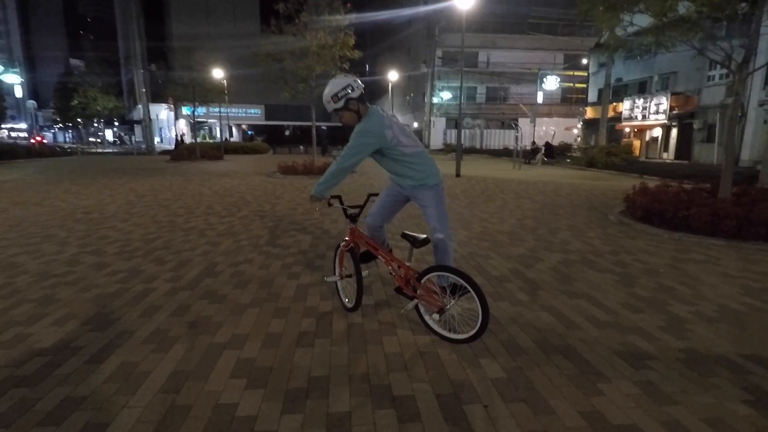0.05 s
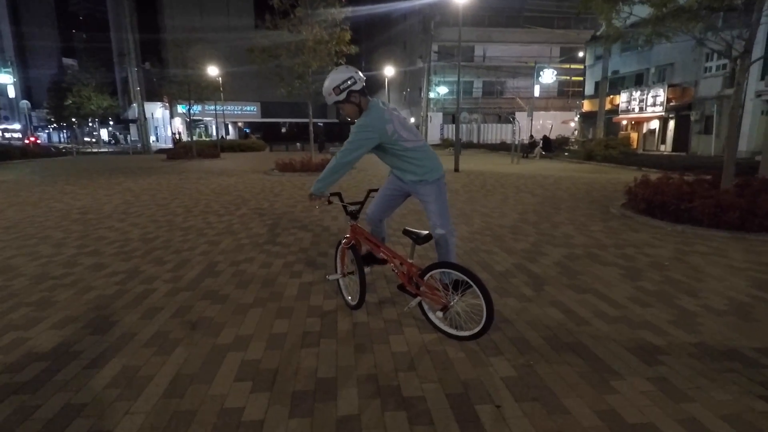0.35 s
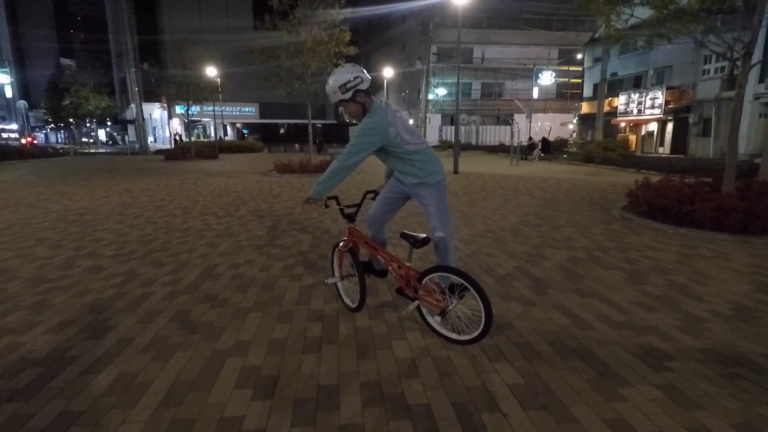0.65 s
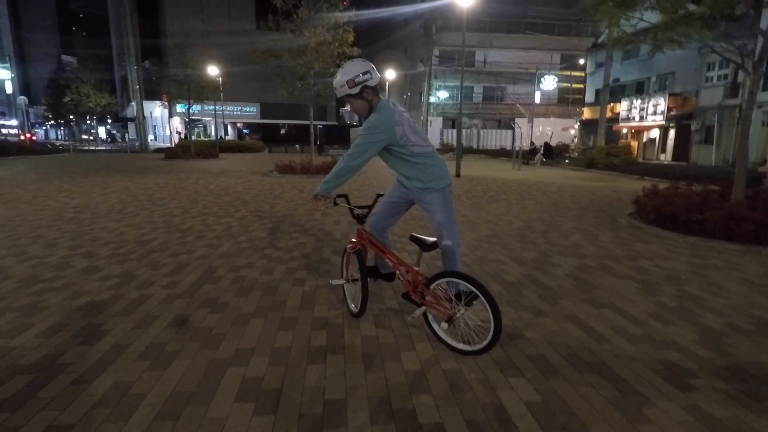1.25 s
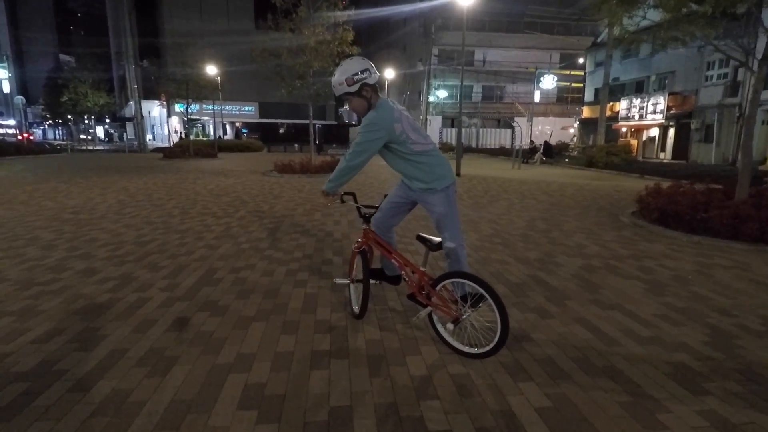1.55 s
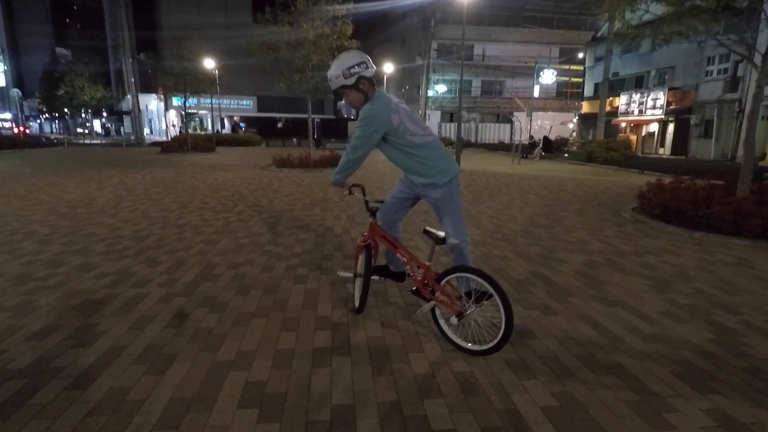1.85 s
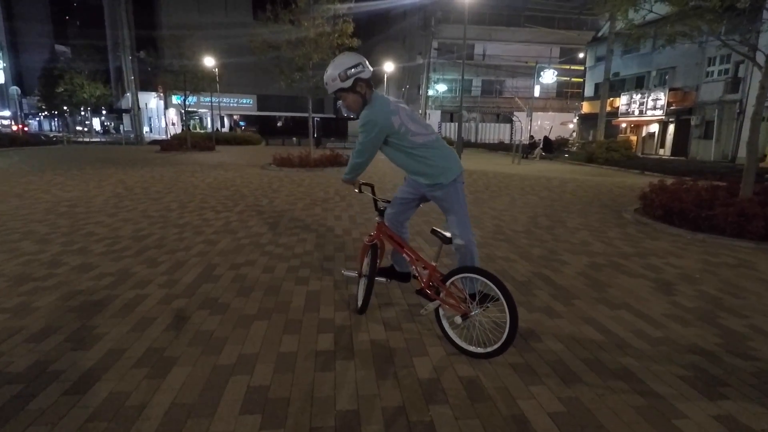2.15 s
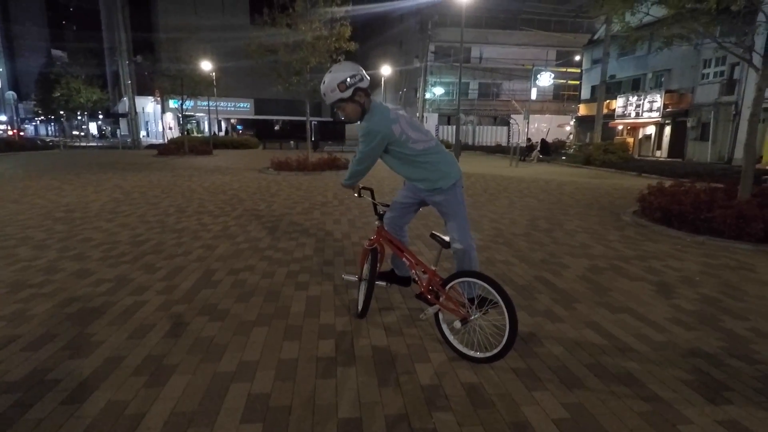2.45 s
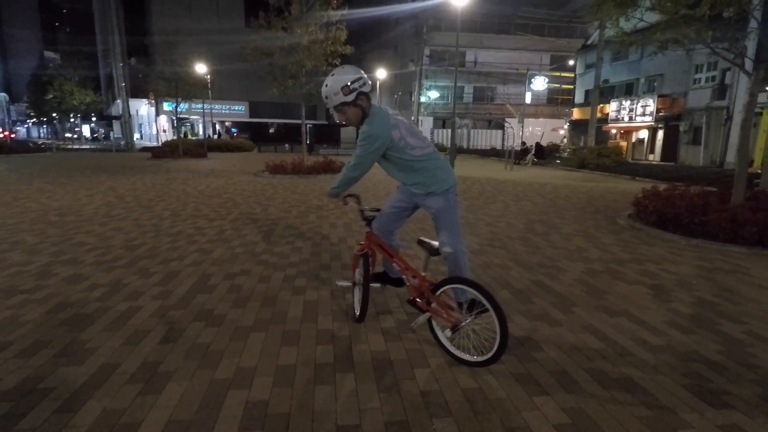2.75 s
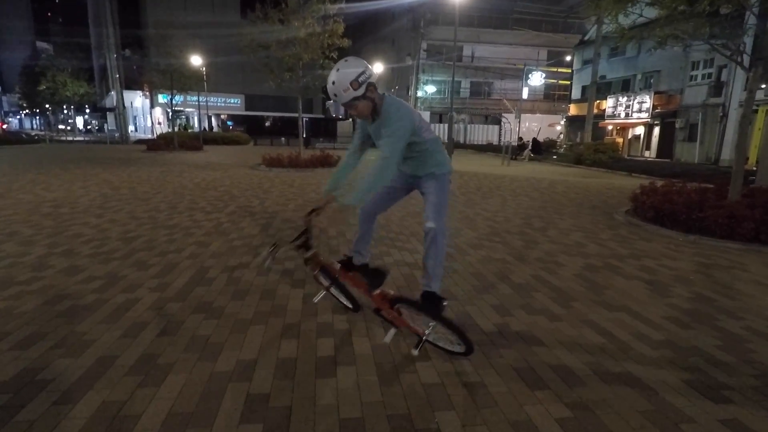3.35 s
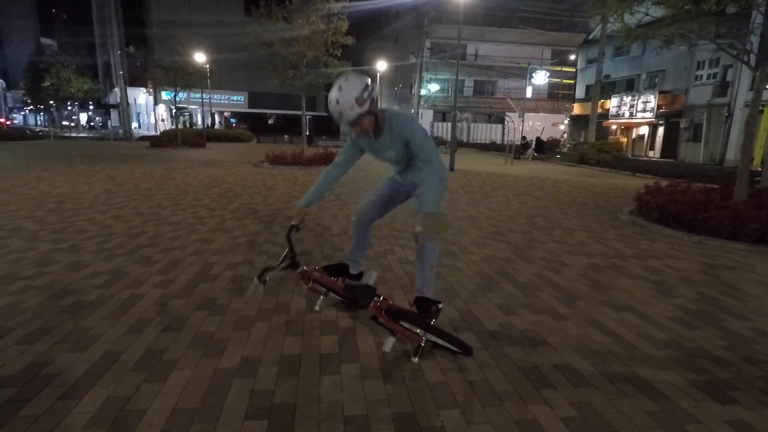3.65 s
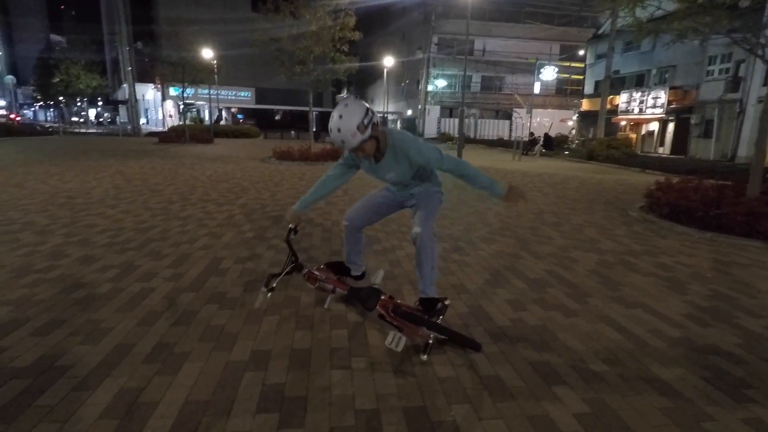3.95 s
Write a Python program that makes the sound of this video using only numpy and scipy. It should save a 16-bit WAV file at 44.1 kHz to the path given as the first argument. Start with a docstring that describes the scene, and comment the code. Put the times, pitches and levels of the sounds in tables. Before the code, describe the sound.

In an open city square, wind rumbles on the microphone over steady far traffic. A nearby bicycle's tyres scuff and its brake chirps faintly, metal clinks once, then the bicycle drops onto the stones with a brief ringing clatter.

```python
"""Air buffets a stereo microphone over the hum of distant traffic, on a paved city square at night.
Nearby a rider balances a small bicycle: the tyres scuff, a brake chirps, and metal clinks sharply once.
At about 3.6 s the bicycle goes down on its side. Pedal, bar and frame strike the paving and ring,
the chain rattles, and far house fronts return a thin tail."""
import sys
import numpy as np
from scipy import signal
from scipy.fft import rfft, irfft
from scipy.io import wavfile
from scipy.ndimage import uniform_filter1d

SR = 44100
rng = np.random.default_rng(int(sys.argv[2]) if len(sys.argv) > 2 else 0)


def output_pcm(signal):
    """Save a mono or channel-first signal as 16-bit PCM at the path in sys.argv[1].

    Samples are clipped to [-1, 1] before scaling.
    """
    pcm = np.clip(np.atleast_2d(signal).T, -1, 1) * 32767
    wavfile.write(sys.argv[1], SR, np.round(pcm).astype(np.int16))


N = 176400

# the bicycle's blows on the paving (t/s, then level/dB of thud, frame ring, clank, chain sizzle)
BLOWS = [(3.557, -36, -39.5, -46.5, -66), (3.571, -32.5, -44, -45.5, -59), (3.604, -45, -42, -47.5, -64),
         (3.620, -46, -41.5, -46, -57.5), (3.659, -45, -34, -40.5, -64), (3.6655, -34, -28, -41.5, -64),
         (3.6715, -49, -43, -37.5, -54), (3.686, -40, -37, -36.5, -58), (3.7006, -17.5, -27.5, -36, -55),
         (3.709, -23.5, -24.5, -37.5, -58), (3.716, -29.5, -28.5, -36.5, -42.5),
         (3.729, -26.5, -42, -35.5, -44), (3.742, -30, -34, -38.5, -44), (3.756, -32.5, -40, -45, -55),
         (3.772, -42, -38, -41.5, -44), (3.793, -44, -57, -51, -66), (3.802, -45, -55, -44, -62),
         (3.827, -42, -50, -51, -65), (3.842, -38, -43, -53, -67), (3.866, -36, -43, -51, -67),
         (3.893, -48, -48, -48, -67), (3.922, -30, -46, -59, -64)]
# contact noise, a band for each level of a blow
# (low f/Hz, high f/Hz, level/dB, decay/s, left-right correlation, left minus right/dB)
CONTACT_BANDS = [(90, 330, -9, 0.0092, 0.75, -1.5), (508, 1016, 1.5, 0.0052, 0.3, -1.5),
                 (1090, 3340, -1.5, 0.012, 0.94, -1.5), (3730, 6500, -5.5, 0.017, .25, -4.5)]
# modes of frame and wheels (f/Hz, level/dB, t60/s, left minus right/dB, left lead/rad)
FRAME_MODES = [(141.8, -2, 0.16, -2.5, -1), (245.5, -11, 0.33, 1, 0.5), (651, -9, 0.14, -13.5, -1),
               (775, -8.5, .2, -5.5, -2.2), (836, -6.5, 0.17, 4.5, -1.8), (902.5, -2.5, 0.19, -2.5, -1.3),
               (1259, -7.5, .1, 7.5, 1), (1680, -12.5, .2, -1, -0.5), (1883, -9, 0.18, -2, -0.5),
               (2060, -10, 0.18, 3, -1), (2284, -23, .18, -1, 1), (2550, -22, .18, 0, 0),
               (2780, -15.5, 0.18, -2, -0.5), (3084, -9.5, 0.2, 3, 1.4), (3746, -12.5, 0.13, -15, 7.5),
               (4220, -13, 0.4, -7, 2.7), (6140, -12, 0.19, -8, 3.5)]
def clatter(t):
    """Near the microphone, each blow gives a gritty burst of noise and rings frame and wheels."""
    out = np.zeros((2, N))
    for k, (lo, hi, db, decay, likeness, pan_db) in enumerate(CONTACT_BANDS):
        power = np.zeros(N)
        for when, *levels in BLOWS:
            i = int(when * SR)
            age = t[:N - i]
            power[i:] += (undb(levels[k] + db) * attack(age) * np.exp(-age / decay)) ** 2
        rattle = unit(undb(2 * walk(rate_hz=597)))
        out += np.sqrt(power) * rattle * noise(band(lo, hi), likeness) * pan(pan_db)
    mode_db, scatter_db, detune = -3, 0.5, .014  # level and pitch vary from blow to blow
    splits_hz = 1.15 * np.array(CONTACT_BANDS)[:-1, 1]  # a mode takes the blow's level in its band
    shakes_rad = [.55 * walk(rate_hz=110) for _ in FRAME_MODES]
    for when, *levels in BLOWS:
        i = int(when * SR)
        age = t[:N - i]
        for (hz, db, t60, pan_db, lead), shake in zip(FRAME_MODES, shakes_rad):
            size, turn, shift = rng.standard_normal(3)
            blow_db = levels[np.searchsorted(splits_hz, hz)]
            ring = undb(blow_db + db + mode_db + scatter_db * size) * attack(age) * fall(age, t60)
            phase = 2 * np.pi * hz * (1 + detune * shift) * age + np.pi * turn + shake[i:]
            out[:, i:] += pan(pan_db) * ring * stereo_sine(phase, lead)
    return out


# loose metal on the falling bicycle, centre (t/s, f/Hz, level/dB, t60/s)
METAL_KNOCKS = [(3.5567, 1330, -31, 0.028), (3.568, 3090, -46.5, .07), (3.672, 3300, -35.5, .04),
                (3.775, 1945, -34, 0.074), (3.778, 4370, -57, 0.33), (3.802, 2960, -36.5, 0.041),
                (3.826, 3030, -40.5, 0.045), (3.846, 845, -42.5, .45), (3.856, 4170, -56.5, 0.22),
                (3.895, 3010, -50, 0.1)]
def loose_metal(t):
    """Loose metal parts knock and buzz briefly, each at its own pitch."""
    out = 0
    for when, hz, db, t60 in METAL_KNOCKS:
        age = np.maximum(t - when, 0)
        phase = 2 * np.pi * hz * age + .6 * walk(rate_hz=450)
        out += undb(db) * attack(age) * fall(age, t60) * np.sin(phase)
    return out


# tyre scuffs, the clink's snap at 3.153 s, then scrapes of the fall
# (t/s, half length/s, centre f/Hz, width/Hz, level/dB)
RUBS = [(1.1, 0.037, 1920, 2200, -55), (1.116, .014, 3400, 500, -55.5), (1.19, .035, 3660, 1300, -63),
        (1.398, 0.088, 1975, 200, -63), (1.838, 0.012, 1700, 600, -53.5), (1.834, 0.017, 650, 450, -49),
        (2.79, 0.06, 905, 170, -51), (3.153, .004, 2700, 2970, -54.5), (3.597, .017, 1250, 353, -47.5),
        (3.613, .008, 2400, 1300, -47), (3.725, 0.026, 2000, 603, -44.5), (3.74, 0.021, 254, 70, -37),
        (3.799, .02, 2350, 800, -49)]
def scuffs(t):
    """Tyres and metal slide on the stones in short grainy rubs, with one snap, just right of centre."""
    out = 0
    for when, length, hz, width, db in RUBS:
        spectrum = band(max(hz - width / 2, 50), hz + width / 2, order=2)
        out += undb(db) * pulse(t, when, length) * diffuse_noise(spectrum)
    grain = unit(undb(2.5 * walk(rate_hz=250)))
    return out * grain * pan(-1.5)


# brake chirps and squeals, then one sharp metal clink in the last two rows
# (t/s, half length/s, f/Hz, level/dB, phase roughness/rad)
CHIRPS_AND_CLINK = [(1.118, .011, 3420, -53.5, .8), (2.76, 0.018, 946, -52, .4),
                    (2.848, 0.037, 924, -53.5, .45), (3.1475, 0.0011, 3310, -35, .5),
                    (3.153, .003, 3380, -41.5, .5)]
def brake_and_clink(t):
    """Right of centre, the brake chirps and faintly squeals; then metal clinks sharply once."""
    out = 0
    for when, length, hz, db, rough in CHIRPS_AND_CLINK:
        phase = 2 * np.pi * hz * t + rough * walk(rate_hz=900)
        out += undb(db) * pulse(t, when, length) * stereo_sine(phase, lead_rad=1.1)
    return out * pan(-3)


# a tyre on the paving, centre (t/s, half length/s, level/dB)
TYRE_BUMPS = [(.538, 0.0011, -22.5)]
def tyre_bump(t):
    """A tyre drops onto the stones with one soft push."""
    return -sum(undb(db) * pulse(t, when, length) for when, length, db in TYRE_BUMPS)


def house_fronts(source, t):
    """From across the square, house fronts return a thin diffuse tail."""
    tail_db, delay_s = -16, 0.021
    tail = diffuse_noise(band(200, 5600, order=1)) * fall(t, t60=0.49) * (t > delay_s)
    return undb(tail_db) * signal.fftconvolve(source, unit(tail) / np.sqrt(N), axes=1)[:, :N]


# spectrum of the air's rumble (f/Hz, relative level/dB)
AIR_SPECTRUM = [(8, -3.5), (20, 1), (32, 4.5), (58, -1), (85, -12.5), (130, -31.5), (300, -63)]
# rise and fall of that rumble (t/s, level/dB)
AIR_LEVEL = [(0, -22.5), (.2, -27.5), (.45, -29.5), (.7, -30), (1.1, -34), (1.5, -29.5), (1.8, -32),
             (2.3, -30.5), (2.6, -31), (2.9, -30.5), (3.3, -32), (3.7, -26.5), (4, -31)]
# single buffets (t/s, half length/s, level/dB)
AIR_BUFFETS = [(0.189, 0.0099, -19), (1.015, 0.01, -21), (1.221, 0.0047, -18), (2.029, 0.0063, -21),
               (2.247, 0.0096, -21.5), (2.413, 0.013, -25), (2.651, 0.0084, -26), (2.876, 0.013, -14),
               (3.131, 0.0082, -15), (3.268, 0.006, -20.5), (3.471, 0.0056, -18.5), (3.759, 0.0027, -22),
               (3.889, 0.0081, -21.5)]
def air(t):
    """Right at the microphone, moving air rumbles and gives single push-and-pull buffets."""
    when, level_db = np.array(AIR_LEVEL).T
    out = noise(undb(over_hz(AIR_SPECTRUM)), likeness=1.0) * undb(np.interp(t, when, level_db))
    for when, length, db in AIR_BUFFETS:
        u = (t - when) / length
        out -= undb(db) * u * np.exp((1 - u * u) / 2)
    return out * pan(-1.5)


# distant traffic as it reaches the square (f/Hz, relative level/dB)
TRAFFIC_SPECTRUM = [(40, -9), (80, -1), (120, -2), (200, -10), (290, -11), (380, -16.5), (500, -14.5),
                    (700, -18), (900, -19.5), (1200, -26), (1550, -29.5), (1950, -30), (2500, -36.5),
                    (3200, -34.5), (4100, -38), (4900, -38), (5700, -45), (6500, -47), (7400, -71.5)]
# its place in the stereo image (f/Hz, left minus right/dB)
TRAFFIC_BALANCE = [(60, -5), (200, 0), (500, -1.5), (800, -1.5), (1150, 2.5), (1800, -0.5), (2800, -0.5),
                   (4200, -0.5), (7000, -5)]
# its slow drift (t/s, bass level/dB, treble level/dB)
TRAFFIC_DRIFT = [(0, 2, -1.5), (0.299, -2, 0.5), (.55, 1.5, 0), (1, 0.5, 1), (1.7, -1.5, 1),
                 (2.199, -0.5, 2), (2.8, -0.5, 2.5), (3.4, 2, 2), (4, 2, 2.5)]
def traffic(t):
    """Far traffic makes a steady roar whose bass flickers and whose treble drifts slowly."""
    balance = over_hz(TRAFFIC_BALANCE)
    roar = diffuse_noise(undb(over_hz(TRAFFIC_SPECTRUM) + np.array([balance, -balance]) / 2))
    bass = irfft(rfft(roar) * band(10, 260), N)
    treble = irfft(rfft(roar) * band(2900, 20000), N)
    middle = roar - bass - treble
    when, bass_db, treble_db = np.array(TRAFFIC_DRIFT).T
    bass *= undb(np.interp(t, when, bass_db) + walk(rate_hz=12))  # 1 dB of flicker
    treble *= undb(np.interp(t, when, treble_db))
    level_db = -39.5 + .5 * walk(rate_hz=3.7)
    return (bass + middle + treble) * undb(level_db)


# likeness of the microphone's two ports for sound from all round (f/Hz, correlation)
PORT_LIKENESS = [(100, 0.91), (280, 0.76), (450, 0), (900, 0.33), (1400, 0.64), (2000, 1), (2300, 0.79),
                 (2700, 0.67), (4000, 0.058), (5600, 0.53), (6500, 0.12)]
def diffuse_noise(gain):
    """Noise of a given spectrum, reaching the microphone from all round."""
    return noise(gain, over_hz(PORT_LIKENESS))


def noise(gain, likeness):
    """Stereo noise of rms 1 with a given spectrum and left-right correlation."""
    mid, side = rfft(rng.standard_normal((2, N)))
    c = np.clip(likeness, -1, 1)
    left_right = mid * np.sqrt(1 + c) + side * np.sqrt(1 - c) * np.array([[1], [-1]])
    return unit(irfft(gain * left_right, N))


def band(lo_hz, hi_hz, order=3):
    """Gain of a band-pass at every frequency."""
    f = np.fft.rfftfreq(N, 1 / SR) + 1
    off_centre = (f * f - lo_hz * hi_hz) / (f * (hi_hz - lo_hz))
    return 1 / np.sqrt(1 + off_centre ** (2 * order))


def over_hz(points):
    """Join (f/Hz, value) points over a log-frequency axis."""
    hz, value = np.array(points).T
    return np.interp(np.log(np.fft.rfftfreq(N, 1 / SR) + 1), np.log(hz), value)


def walk(rate_hz):
    """Smooth random motion with spread 1."""
    k = max(int(SR / rate_hz), 2)
    steps = np.repeat(rng.standard_normal(N // k + 1), k)
    return unit(uniform_filter1d(steps, k)[:N])


def attack(age, rise_s=0.0014):
    """Quick rise after a blow."""
    return 1 - np.exp(-age / rise_s)


def fall(age, t60):
    """Decay by 60 dB in t60 seconds."""
    return np.exp(-np.log(1000) * age / t60)


def pulse(t, when, half_length):
    """Bell-shaped rise and fall."""
    return np.exp(-((t - when) / half_length) ** 2 / 2)


def stereo_sine(phase, lead_rad):
    """A tone whose left channel leads."""
    return np.sin(phase + np.array([[lead_rad], [0]]))


def pan(db):
    """Channel gains for a left-minus-right level."""
    return undb(np.array([[db], [-db]]) / 2)


def undb(db):
    """Decibels to gain."""
    return 10 ** (np.asarray(db) / 20)


def unit(x):
    """Scale to rms 1."""
    return x / np.sqrt(np.mean(x ** 2))


def scene():
    """The bicycle nearby, house fronts and traffic far off, air on the microphone."""
    t = np.arange(N) / SR
    bicycle = clatter(t) + loose_metal(t) + tyre_bump(t) + scuffs(t) + brake_and_clink(t)
    return bicycle + house_fronts(bicycle, t) + traffic(t) + air(t)


def record(dry):
    """The recorder cuts steeply above 7400 Hz."""
    return signal.sosfilt(signal.ellip(10, .2, 80, 7400, fs=SR, output="sos"), dry)


dry = scene()
out = record(dry)
output_pcm(out)
```